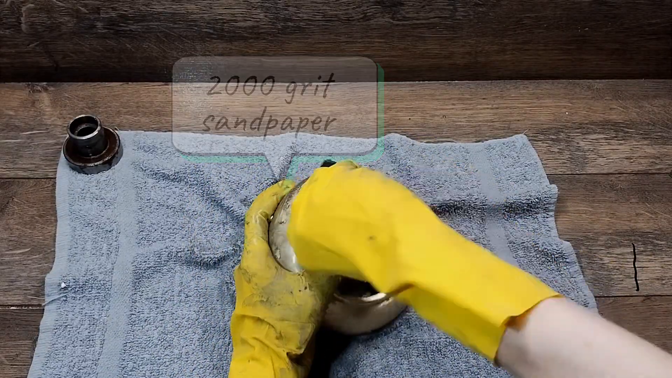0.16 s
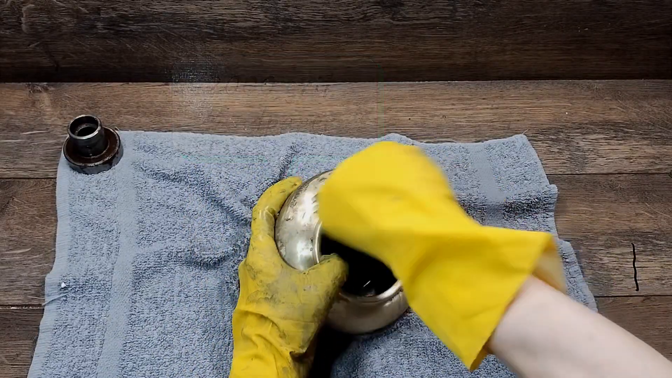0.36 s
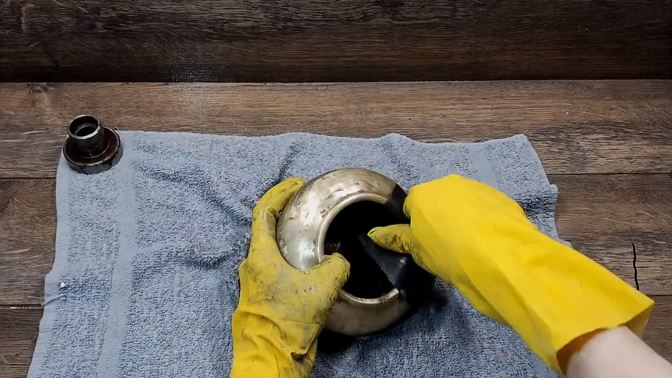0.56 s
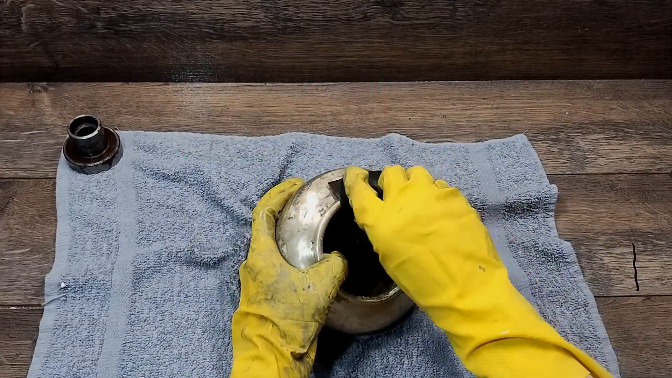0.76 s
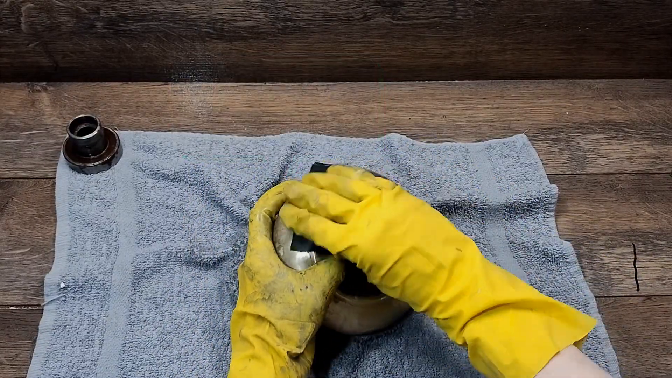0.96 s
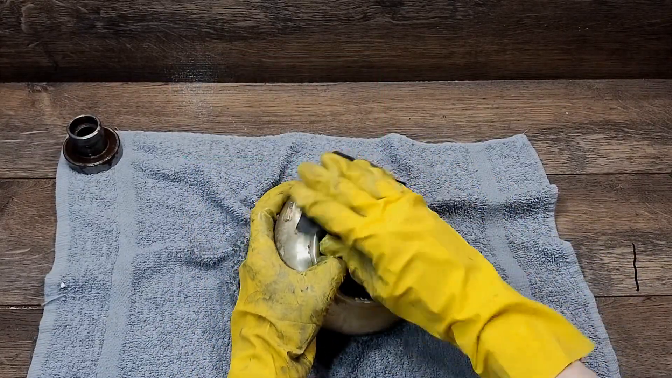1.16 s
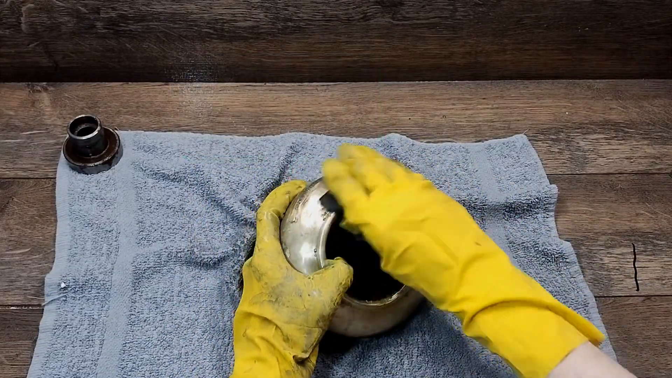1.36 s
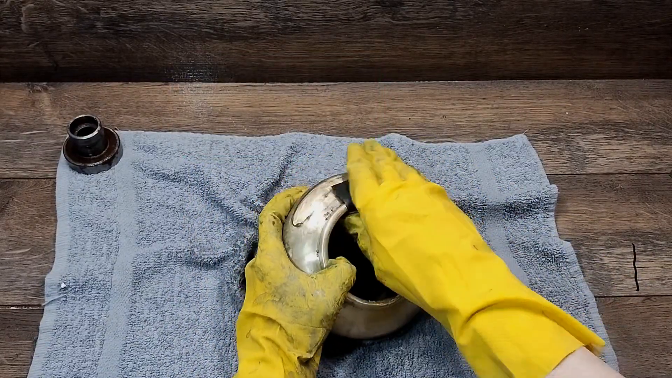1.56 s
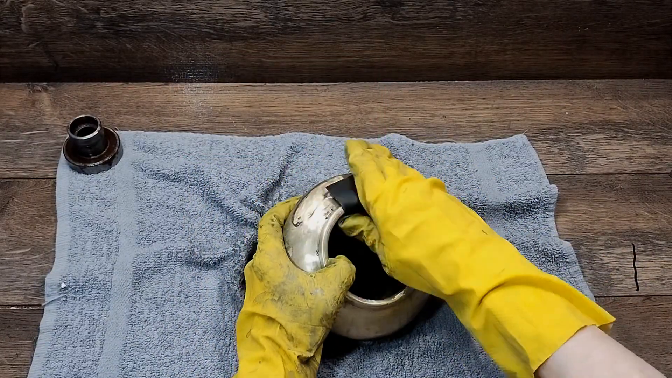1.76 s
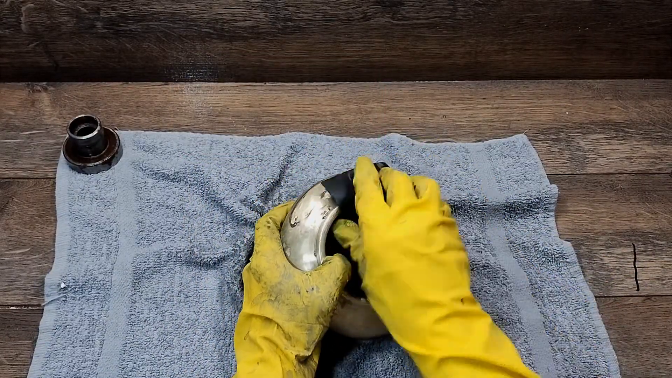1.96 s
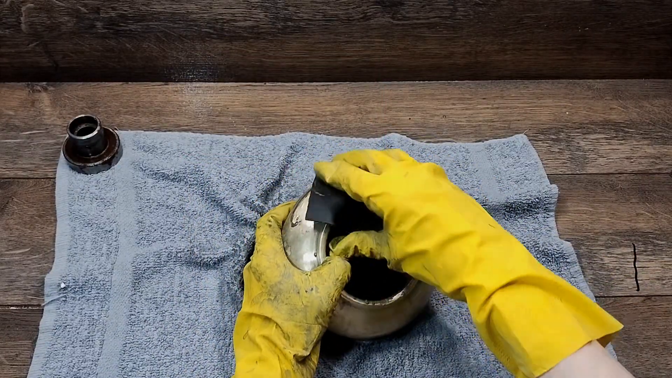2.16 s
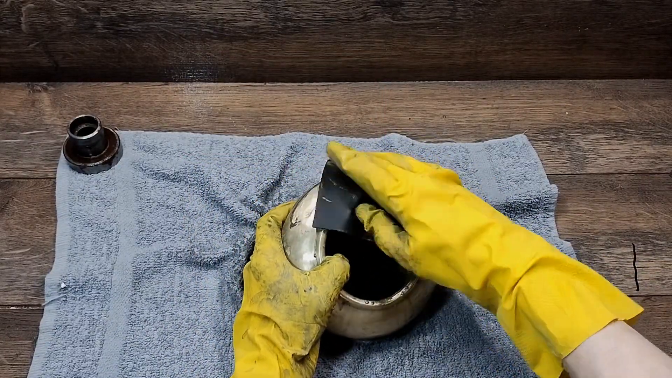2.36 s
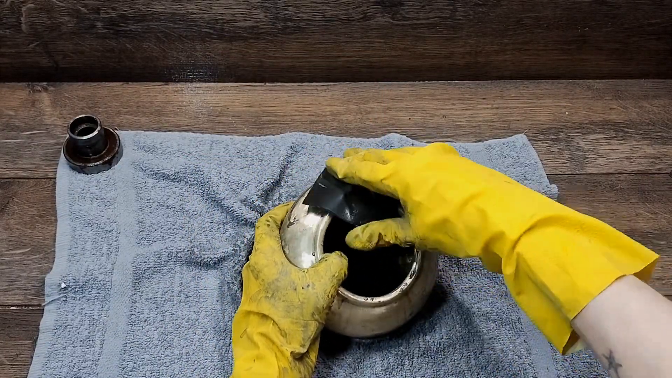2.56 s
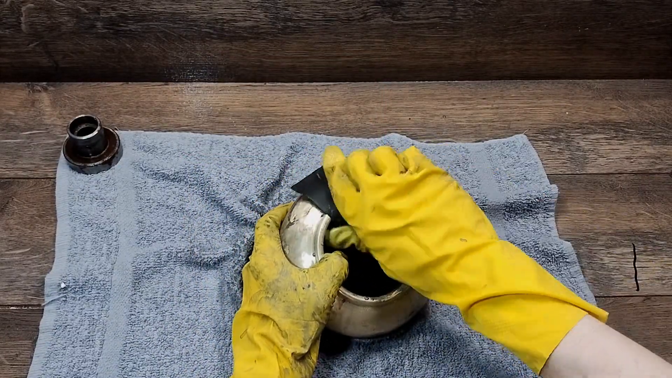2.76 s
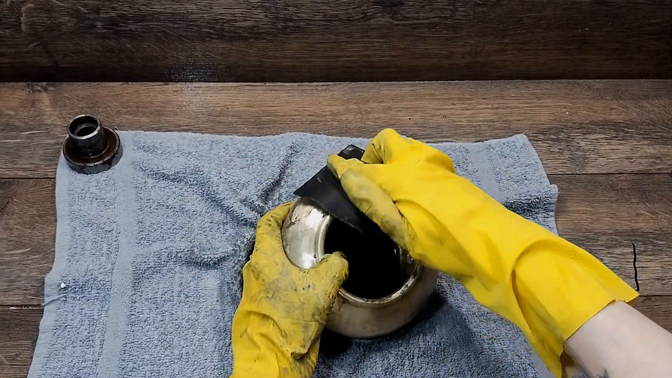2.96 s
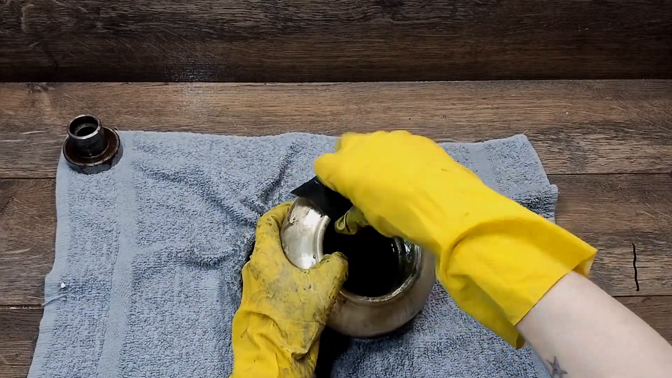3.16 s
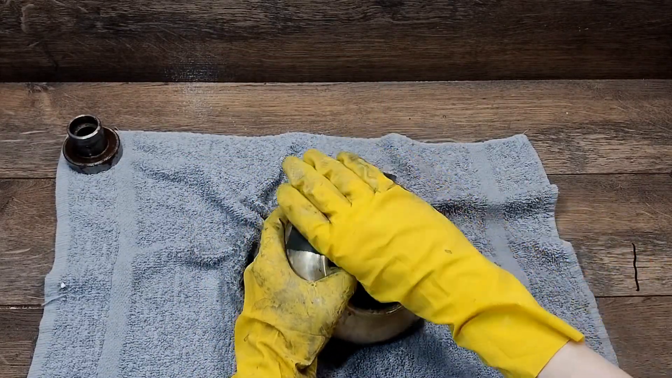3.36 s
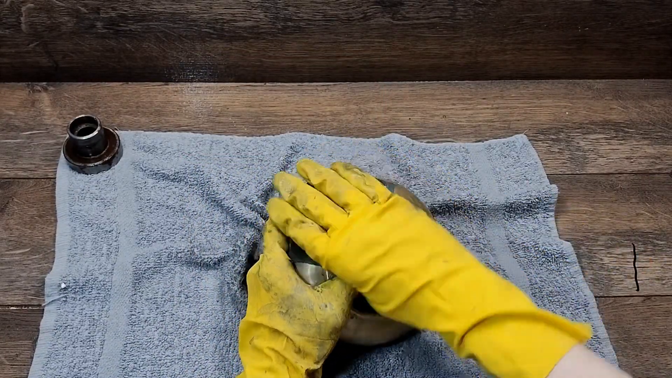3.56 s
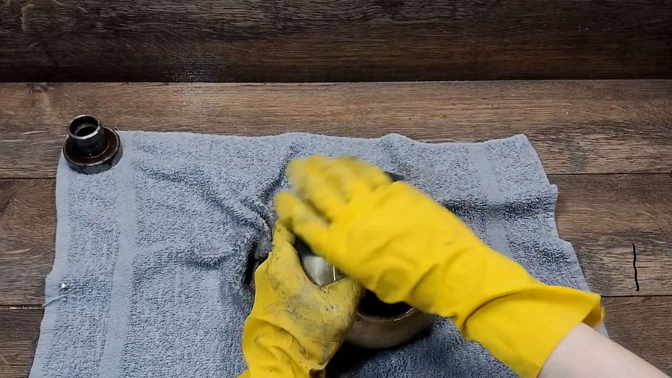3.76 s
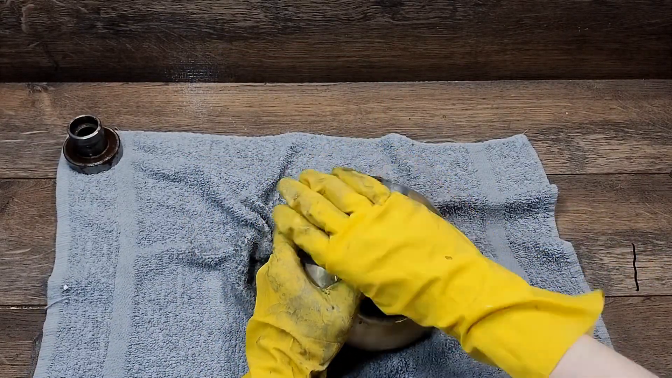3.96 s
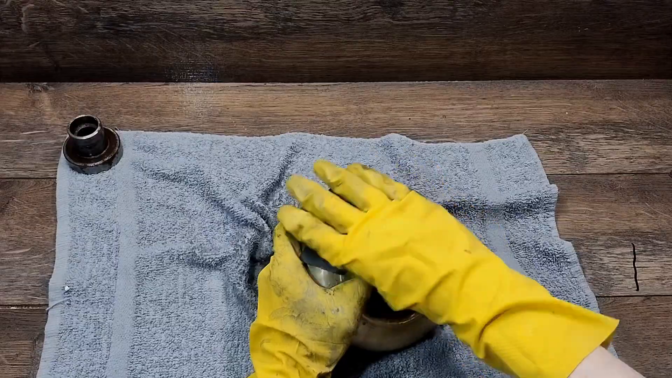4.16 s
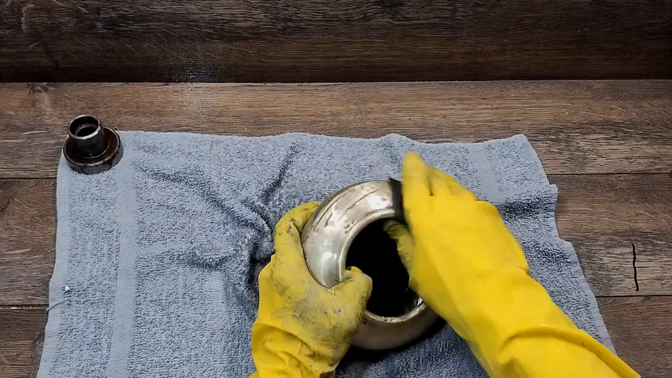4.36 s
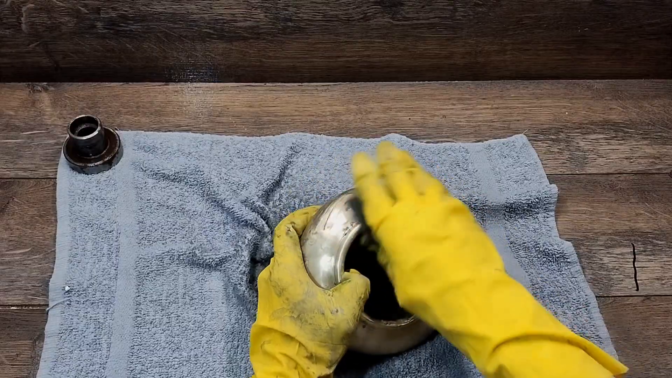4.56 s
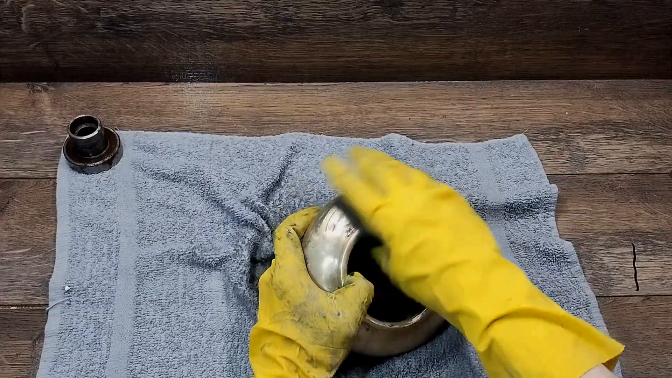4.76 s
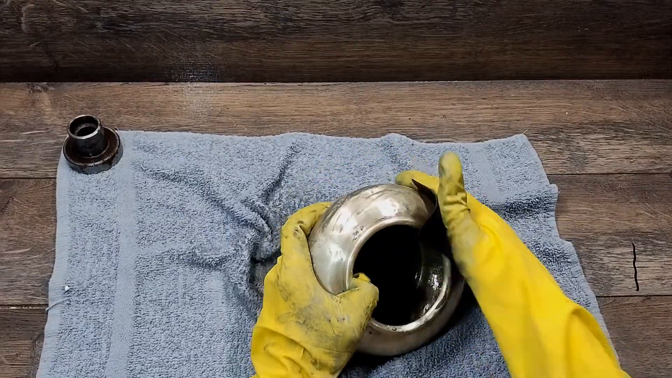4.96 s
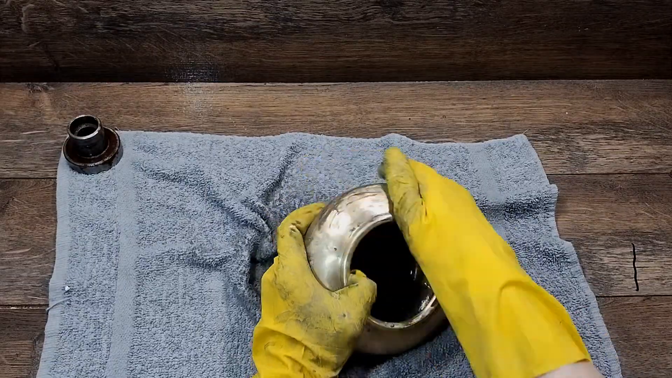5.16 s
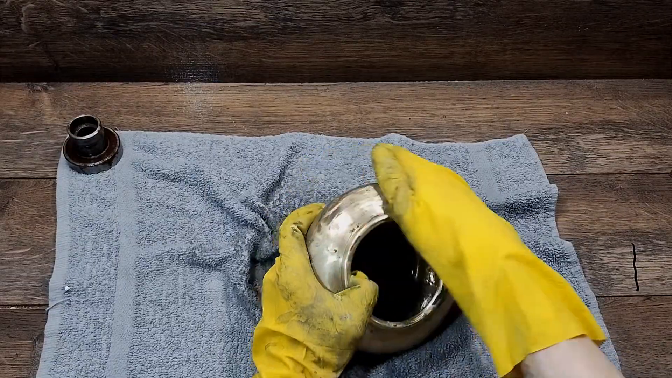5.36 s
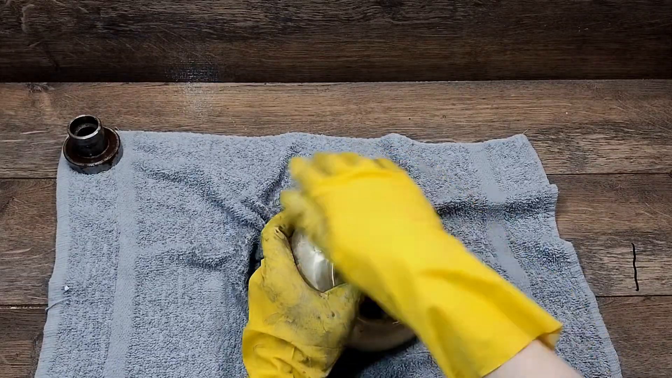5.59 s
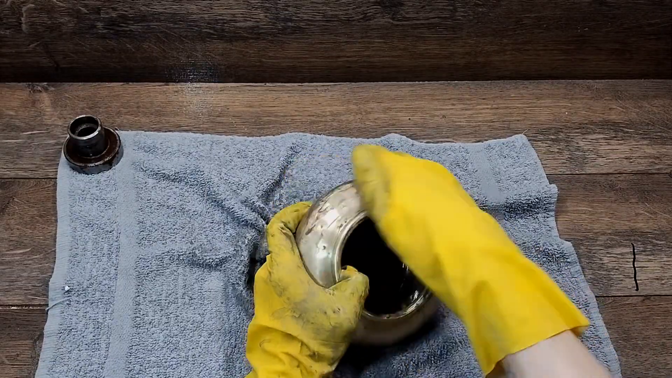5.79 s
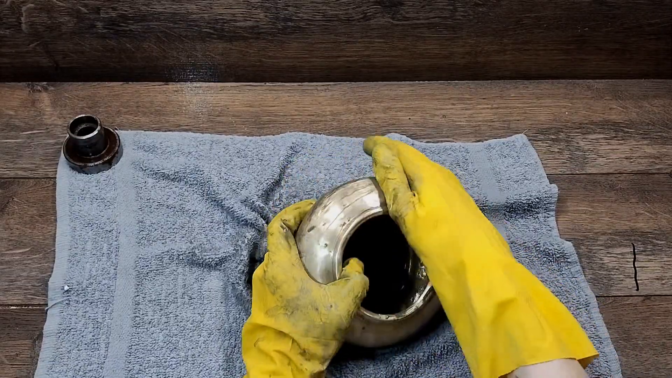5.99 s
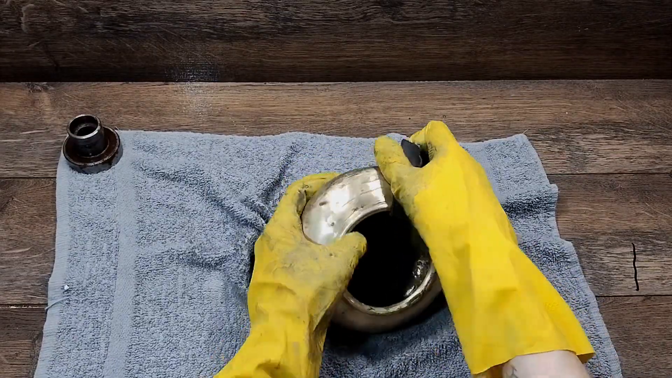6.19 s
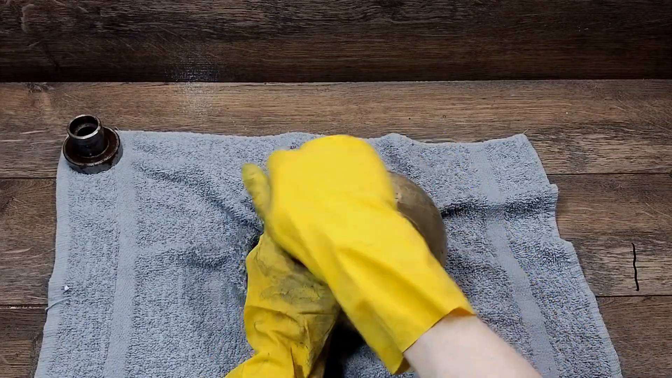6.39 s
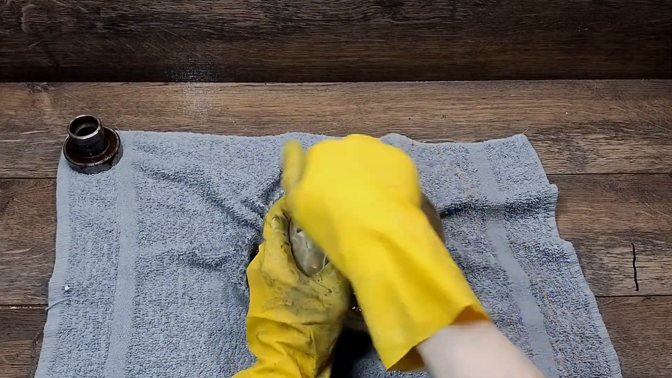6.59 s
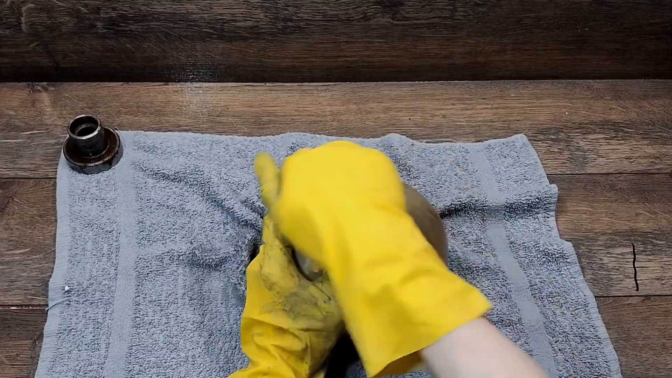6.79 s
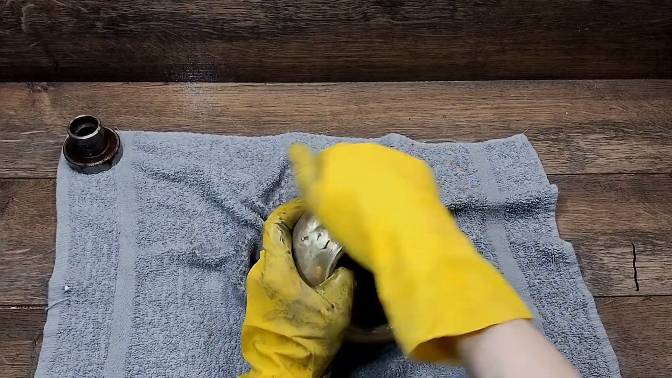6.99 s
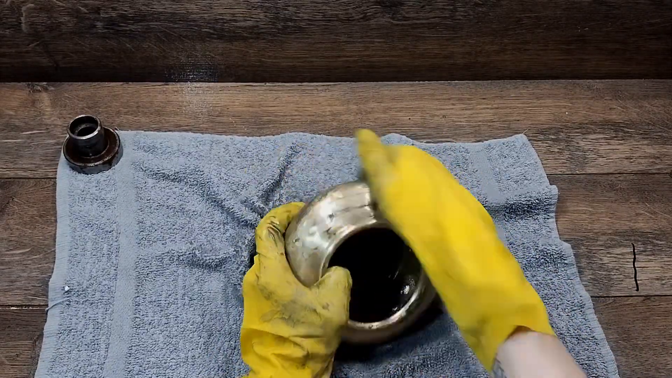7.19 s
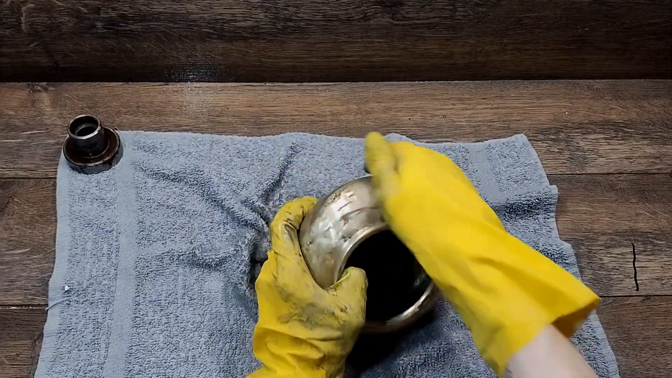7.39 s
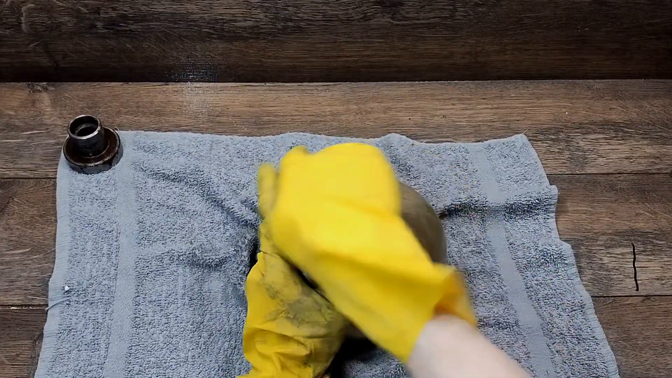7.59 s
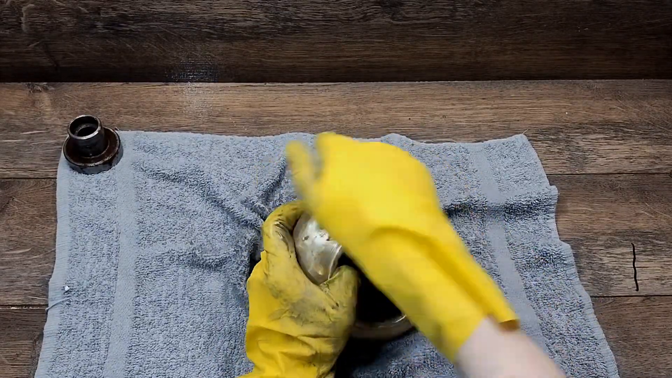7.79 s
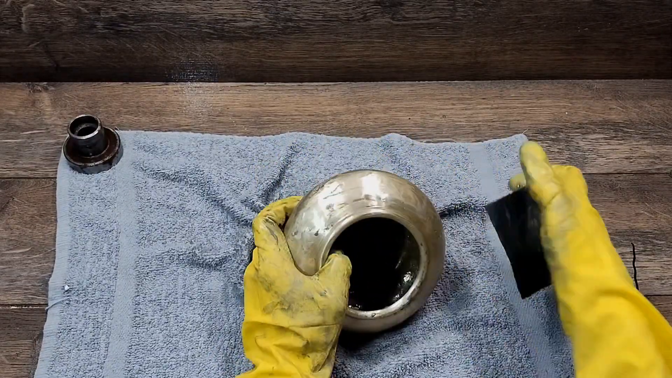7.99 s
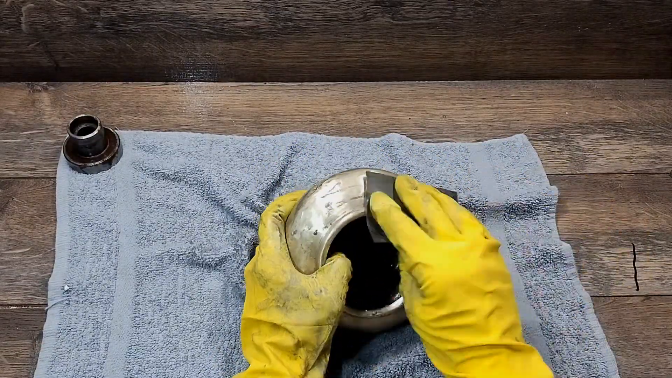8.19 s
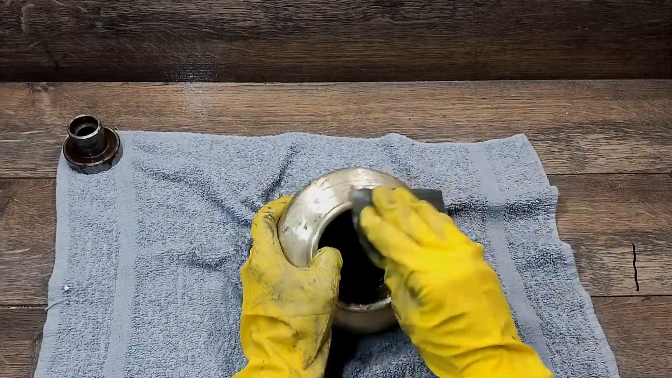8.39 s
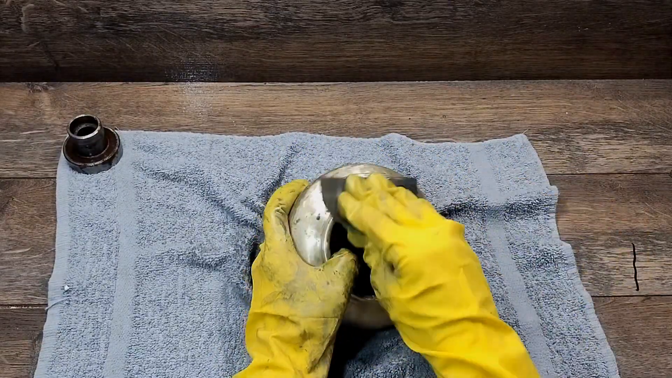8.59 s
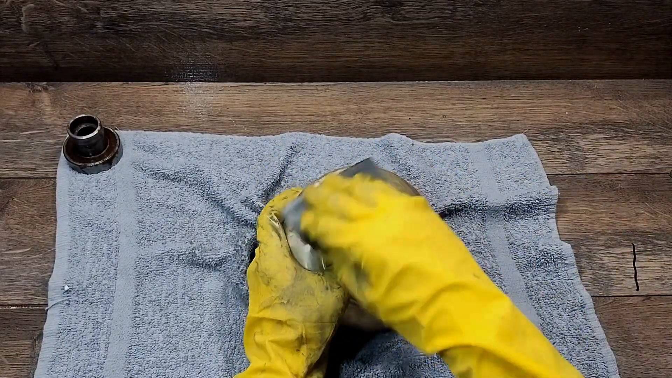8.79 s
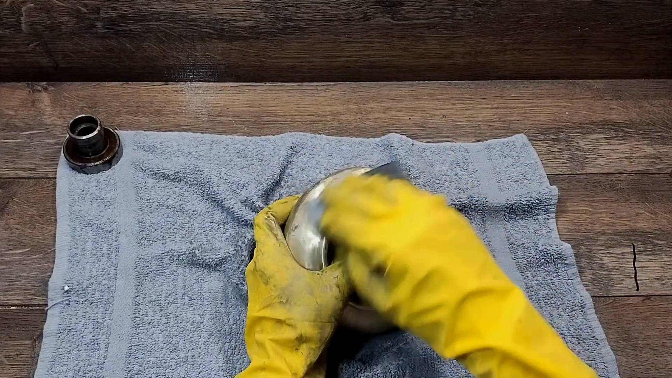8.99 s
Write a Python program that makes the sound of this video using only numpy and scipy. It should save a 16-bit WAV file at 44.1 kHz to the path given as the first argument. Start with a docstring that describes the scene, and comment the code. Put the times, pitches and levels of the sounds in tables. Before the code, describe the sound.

Fine sandpaper scrubs a small brass bowl in quick back-and-forth strokes, a bright hiss over a lower rasp. After about two seconds it drops to faint brushes, rubber squeaks and soft thuds as the grip shifts. Steady sanding resumes with brief lulls and a few short hollow bonks, then turns quicker and lighter, with one louder bonk near the end. The microphone is close, in a quiet room.

```python
"""A quiet room, a stereo pair close to a small brass bowl on a towel, polished in rubber gloves.
Fine sandpaper sets off at once: a bright hiss from the grit, a lower rasp from paper and wall.
The other glove damps the bowl, so its hollow only murmurs. Near 2 s the grip shifts, with faint brushes,
squeaks and thuds. From 3.5 s the strokes run on with brief lulls, and bumping fingers raise short bonks.
After 8 s come quicker, lighter strokes with a higher rasp, and the loudest bonk."""
import sys
import numpy as np
from scipy import signal
from scipy.fft import rfft, irfft
from scipy.io import wavfile
from scipy.ndimage import uniform_filter1d

SR = 44100
rng = np.random.default_rng(int(sys.argv[2]) if len(sys.argv) > 2 else 0)


def int16_out(signal):
    """Quantize to a 16-bit WAV file."""
    q = np.round(np.clip(np.atleast_2d(signal).T, -1, 1) * 32767)
    wavfile.write(sys.argv[1], SR, q.astype(np.int16))


N = 398663
TIME = np.arange(N) / SR
BINS = np.fft.rfftfreq(N, 1 / SR)
FRAME, HOP = 512, 128  # samples
FRAMING = dict(nperseg=FRAME, noverlap=FRAME - HOP)
FULL_DB = -31.5  # stroke level that counts as full effort
# how the paper lies on the bowl: time_s, rasp_pitch_factor, ring_vs_rasp_db, comb_db, rasp_vs_hiss_db
CONTACT = [(0, 1.01, -9, 4.5, -6.5), (.58, 1.08, -3, 6.5, -6), (.9, 0.98, -10, 2, -8.5),
           (1.1, 1.16, -4, 1.5, -7.5), (1.36, 1, -6, 3.5, -8), (1.6, 1.04, -8, 4.5, -8),
           (1.85, 1.08, 0, 6, -5), (2.1, 1.04, 0, 5, -15), (2.9, 0.91, -7, 4, -16),
           (3.42, 1.07, -6, 4, -10.5), (3.8, 1.05, -6, 5.5, -5.5), (4.4, 1.01, -7.5, 3, -7.5),
           (4.85, 1.22, -8.5, 7, -10), (5.15, 0.96, -16, 2, -6), (5.9, 0.96, -17, 3, -7),
           (6.25, 1.1, -16, 3, -10.5), (6.6, 0.93, -19, 2, -7.5), (7.6, 0.98, -12, 5.5, -10),
           (7.95, 1.04, -19, -3, -7), (8.33, 1.29, -6, 2.5, -12.5), (8.65, 1.4, -6, 2.5, -5.5),
           (9.04, 1.3, -6.5, 2, -5.5)]


def sandpaper(effort, rasping):
    """Grit scrapes the brass under each stroke, with a grip that flutters, and sets the wall ringing."""
    # hiss of the grit, pressed down and barely touching: frequency_hz, gain_db
    hiss_colour = [(900, -58), (2000, -39), (3500, -12.5), (5000, -6), (6000, -4), (7200, -2), (8500, 1.45),
                   (10000, 1.5), (11200, -0.5), (12500, -2.5), (14300, -7)]
    skim_colour = [(900, -13), (3000, -12), (5000, -20), (7500, -5.5), (8700, 0), (10500, -0.5),
                   (14300, -6)]
    # damped modes of the held wall: pitch_hz, width_hz, gain_db
    wall_modes = [(1060, 180, -8), (1484, 55, -9), (2170, 260, -1), (2355, 120, 2), (2820, 120, 3),
                  (3290, 190, -6.5), (3970, 250, -8)]
    firm_db = -47.5  # strokes above this press the whole paper down
    times, _, ring_db, _, rasp_db = np.transpose(CONTACT)
    hiss_level = gain_of(FULL_DB) * effort
    rasp_level = gain_of(FULL_DB + np.interp(TIME, times, rasp_db)) * rasping
    grip = gain_of(.5 * wander(rate_hz=70) + .35 * wander(rate_hz=500))
    grains = grit(per_s=12000, spread_db=2, bed=1.3)
    scrape = shaded(grains, depth_db=2.14, width_hz=240, hold_s=0.029)
    firm = hiss_level ** 2 / (hiss_level ** 2 + gain_of(firm_db) ** 2)
    hiss = firm * radiate(scrape, tone(hiss_colour))
    hiss += (1 - firm) * radiate(scrape, tone(skim_colour))  # a light touch gives only a thin fizz
    rub = shaded(grains, depth_db=1.5, width_hz=200, hold_s=0.11)
    rasp = radiate(under_fingers(rub, gap_ms=1.724, travel_ms=0.251), 1)
    modes = sum(gain_of(db) * peak(hz, width) for hz, width, db in wall_modes)
    wall = radiate(shaded(noise(), depth_db=1, width_hz=180, hold_s=0.16), modes)
    ring = gain_of(np.interp(TIME, times, ring_db))
    body = (rasp + ring * wall) / np.sqrt(1 + ring ** 2)
    return grip * (gain_of(0.81) * hiss_level * hiss + gain_of(-0.6) * rasp_level * body)


def under_fingers(x, gap_ms, travel_ms):
    """The rasp's pitch follows the contact, and an echo off the sliding glove sweeps a comb through it."""
    # rasp of the paper: frequency_hz, gain_db
    rasp_colour = [(500, -20), (1000, -23.5), (1750, -15.5), (2100, -7.5), (2400, -3), (2800, 0.5),
                   (3300, 2.5), (4000, -0.5), (5000, -5), (7000, -10), (12000, -42)]
    hz, t, spectra = signal.stft(x, SR, **FRAMING)
    times, pitch, _, comb_db, _ = np.transpose(CONTACT)
    colour_db = read(rasp_colour, hz[:, None] / np.interp(t, times, pitch))
    echo_s = (gap_ms + travel_ms * np.interp(t, TIME, wander(rate_hz=6))) / 1000
    colour_db += np.interp(t, times, comb_db) * np.cos(2 * np.pi * hz[:, None] * echo_s)
    return signal.istft(spectra * gain_of(colour_db), **FRAMING)[1][:, :N]


def stroking():
    """Effort and the rasp it raises; hiss needs more speed, so the sound dulls at each turn of the hand."""
    # each push or pull of the paper: start_s, length_s, level_db, top_speed_at_share
    strokes = [(-0.005, 0.073, -35.0, 0.29), (0.074, 0.046, -31.5, 0.33), (0.107, 0.079, -36.5, 0.28),
               (0.166, 0.1, -34, 0.59), (0.296, 0.12, -36.0, 0.19), (0.402, 0.11, -35.5, 0.45),
               (0.519, 0.054, -35, 0.4), (0.561, 0.079, -36, 0.21), (0.646, 0.074, -38, 0.32),
               (0.693, 0.058, -41.5, 0.59), (0.743, 0.13, -51, 0.4), (0.907, 0.14, -38, 0.63),
               (1.02, 0.086, -47.5, 0.67), (1.098, 0.063, -36.5, 0.21), (1.187, 0.069, -46, 0.2),
               (1.229, 0.066, -39.5, 0.46), (1.302, 0.13, -36.5, 0.42), (1.429, 0.097, -35.5, 0.34),
               (1.533, 0.062, -37.5, 0.38), (1.587, 0.061, -36, 0.22), (1.656, 0.092, -35.5, 0.35),
               (1.743, 0.057, -36.0, 0.29), (1.798, 0.042, -37.5, 0.4), (1.908, 0.023, -56, 0.6),
               (2.028, 0.069, -50.5, 0.23), (2.061, 0.049, -41.5, 0.45), (2.105, 0.045, -51.5, 0.5),
               (2.164, 0.12, -59.5, 0.56), (2.335, 0.055, -53, 0.24), (2.597, 0.04, -53.5, 0.5),
               (2.63, 0.036, -48.5, 0.45), (2.804, 0.037, -54.5, 0), (2.84, 0.027, -53.5, 0.35),
               (3.363, 0.11, -40, 0.74), (3.473, 0.079, -47, 0.38), (3.52, 0.063, -32, 0.38),
               (3.612, 0.058, -31.5, 0.38), (3.661, 0.087, -33, 0.56), (3.734, 0.05, -40.5, 0.5),
               (3.788, 0.084, -34, 0.6), (3.869, 0.132, -35.5, 0.47), (3.998, 0.077, -32.0, 0.48),
               (4.066, 0.084, -30.5, 0.66), (4.136, 0.12, -33.0, 0.58), (4.249, 0.067, -29.5, 0.61),
               (4.311, 0.083, -32, 0.33), (4.388, 0.054, -31.0, 0.63), (4.432, 0.069, -31.5, 0.52),
               (4.495, 0.064, -30.0, 0.51), (4.544, 0.056, -30, 0.42), (4.594, 0.07, -30.5, 0.36),
               (4.642, 0.054, -31.5, 0.33), (4.686, 0.065, -31.5, 0.57), (4.744, 0.082, -33.5, 0.34),
               (4.821, 0.074, -28, 0.53), (4.874, 0.056, -43, 0.6), (5.017, 0.109, -45, 0.4),
               (5.057, 0.13, -33.5, 0.59), (5.187, 0.084, -32.0, 0.48), (5.274, 0.099, -33.5, 0.58),
               (5.38, 0.078, -32, 0.36), (5.455, 0.075, -30.5, 0.5), (5.522, 0.085, -31, 0.48),
               (5.593, 0.084, -30.5, 0.42), (5.677, 0.067, -30.5, 0.36), (5.734, 0.077, -31, 0.53),
               (5.805, 0.086, -31, 0.35), (5.864, 0.074, -31, 0.5), (5.932, 0.098, -32.0, 0.34),
               (5.991, 0.068, -46, 0.75), (6.065, 0.097, -47.5, 0.47), (6.2, 0.097, -56.5, 0.55),
               (6.314, 0.041, -46, 0.53), (6.351, 0.12, -50.5, 0.13), (6.421, 0.094, -33.5, 0.45),
               (6.512, 0.091, -31, 0.49), (6.59, 0.124, -33, 0.64), (6.72, 0.071, -30.5, 0.43),
               (6.781, 0.1, -31.5, 0.46), (6.89, 0.076, -31.5, 0.4), (6.972, 0.092, -31.5, 0.53),
               (7.062, 0.084, -32.5, 0.4), (7.145, 0.076, -31.5, 0.43), (7.219, 0.083, -32, 0.65),
               (7.274, 0.13, -33.5, 0.58), (7.395, 0.069, -31.5, 0.41), (7.45, 0.1, -32.5, 0.45),
               (7.565, 0.071, -32.0, 0.36), (7.634, 0.082, -32.0, 0.41), (7.718, 0.077, -33, 0.38),
               (7.78, 0.08, -32.5, 0.48), (7.868, 0.073, -33.5, 0.38), (7.922, 0.089, -43, 0.51),
               (8.254, 0.066, -51.5, 0.34), (8.307, 0.077, -35.5, 0.39), (8.392, 0.07, -34.5, 0.44),
               (8.454, 0.047, -35.5, 0.47), (8.492, 0.052, -41, 0.64), (8.54, 0.048, -37.5, 0.32),
               (8.585, 0.036, -41, 0.46), (8.616, 0.038, -36.5, 0.43), (8.652, 0.051, -42.5, 0.39),
               (8.696, 0.044, -39, 0.45), (8.739, 0.061, -38.5, 0.32), (8.808, 0.049, -37, 0.38),
               (8.841, 0.079, -37, 0.48), (8.929, 0.053, -35.5, 0.48), (8.974, 0.048, -35, 0.48),
               (9.018, 0.041, -36.5, 0.45)]
    usual_s, rasp_exponent = 0.094, 0.73
    effort_power, rasp_power = np.zeros((2, N))
    for start, length, db, top in list(strokes) + brushes():
        span, shape = swing(start, length, top)
        push = gain_of(db - FULL_DB) * shape
        long_stroke_db = 1.5 * np.log2(length / usual_s)  # long, slow strokes rasp more
        effort_power[span] += push ** 2
        rasp_power[span] += (push ** rasp_exponent * gain_of(long_stroke_db)) ** 2
    return np.sqrt(effort_power), np.sqrt(rasp_power)


def swing(start, length, top):
    """The hand speeds up, peaks at the share top of the stroke and stops: (samples, hiss amplitude)."""
    span = slice(*np.searchsorted(TIME, [start, start + length]))
    progress = np.clip((TIME[span] - start) / length, 0, 1)
    skew = np.log(.5) / np.log(np.clip(top, .1, .9))
    speed = abs(np.sin(np.pi * progress ** skew))
    return span, speed ** 1.64


def brushes():
    """The paper brushes the brass in faint chance strokes while the fingers shift their grip."""
    # shifts of grip: start_s, end_s, level_db
    regrips = [(1.834, 2.02, -59), (2.16, 2.62, -60.5), (2.739, 2.99, -62.5), (3.094, 3.39, -74.5),
               (4.91, 4.98, -57)]
    usual_s = 0.0466
    rows = []
    for start, end, db in regrips:
        for stretch, top in rng.uniform([.5, .2], [1.5, .8], (20, 2)):
            length = stretch * usual_s
            if start + length / 2 < end:
                rows.append((start, length, db, top))
            start += length
    return rows


def grit(per_s, spread_db, bed):
    """Grains catch and let go: tiny clicks of uneven size over a bed of countless finer ones."""
    sizes = gain_of(spread_db * np.minimum(rng.exponential(1, N), 4))
    catches = rng.random(N) < per_s / SR
    return evened(sizes * catches * noise()) + bed * noise()


def shaded(x, depth_db, width_hz, hold_s):
    """The moving hand covers and mirrors the contact, so peaks and dips drift through the sound."""
    spectra = signal.stft(x, **FRAMING)[2]
    ripple = rng.standard_normal(spectra.shape)
    for axis, span in ((1, width_hz * FRAME / SR), (2, hold_s * SR / HOP)):
        for _ in range(2):
            ripple = uniform_filter1d(ripple, max(round(span), 1), axis)
    spectra *= gain_of(depth_db * evened(ripple))
    return evened(signal.istft(spectra, **FRAMING)[1][:, :N])


def hands(effort):
    """Glove and paper drag over the bowl; their pressure stirs the air in it and rocks it on the towel."""
    # the hands at full effort: time_s, drag_db, hollow_db, rocking_db
    handling = [(0, -53, -58.5, -58.5), (.55, -56, -57, -59), (.88, -56, -60.5, -63.5),
                (1.08, -57.5, -58, -62.5), (1.65, -54, -61.5, -59), (2.15, -62, -62.5, -64),
                (2.45, -60, -61.5, -60), (3.08, -70.5, -82, -71), (3.35, -67, -74, -65.5),
                (3.75, -53, -59.5, -59), (4.25, -51, -56.5, -62.5), (4.7, -49, -55, -57),
                (5.2, -55, -70.5, -61), (6.3, -54, -65, -62), (7.5, -61.5, -65, -62.5),
                (8.18, -63, -69.5, -63), (8.66, -52.5, -52.5, -63), (9.04, -51, -60.5, -73)]
    # light dragging, the hollow under the hand, dull rocking on the table: frequency_hz, gain_db
    drag_colour = [(300, -2.5), (750, -8.5), (1050, 1.5), (1450, 4), (1800, 0.5), (2350, 6.5), (3100, 0.5),
                   (4000, -13), (5500, -21.5), (9000, -9), (14000, -17.5)]
    hollow_colour = [(30, -27), (70, -5), (150, -13), (310, -7.5), (410, 4), (510, 1.5), (620, -5.5),
                     (800, -14.5), (1500, -26), (4000, -58)]
    rocking_colour = [(20, -12), (50, -13.5), (100, -5), (150, 1), (240, 2), (320, -3), (500, -14.5),
                      (1000, -47)]
    times, *levels = np.transpose(handling)
    drag_db, hollow_db, rocking_db = (np.interp(TIME, times, level) for level in levels)
    motion = np.hypot(effort, 0.17)  # the hands never quite rest
    snags = grit(per_s=2500, spread_db=2.8, bed=1.1)
    crinkle = shaded(snags, depth_db=3.0, width_hz=250, hold_s=0.047)
    drag = radiate(crinkle, tone(drag_colour)) * motion ** 0.21
    drag *= gain_of(drag_db + 2.05 * wander(rate_hz=56))
    murmur = shaded(noise(), depth_db=4.0, width_hz=90, hold_s=0.07)
    hollow = radiate(murmur, tone(hollow_colour)) * motion ** 0.17  # duller layers follow effort less
    hollow *= gain_of(hollow_db + 2.4 * wander(rate_hz=24))
    rocking = radiate(noise(), tone(rocking_colour))
    rocking *= np.hypot(gain_of(rocking_db + 1.8 * wander(rate_hz=9.8)), thuds(swell_s=0.013))
    return drag + hollow + rocking


def bumps(t60_s, swell_s, tap_s):
    """A finger taps the wall and the air in the bowl bonks, lower when the hand covers the mouth."""
    # fingers knocking the bowl: start_s, pitch_hz, bonk_db, tap_db
    knocks = [(4.419, 480, -41, -46), (4.481, 405, -39, -60), (4.612, 466, -40, -51),
              (4.787, 430, -39, -46), (4.797, 350, -37, -67), (4.856, 447, -43, -50),
              (8.055, 402, -62, -51.5), (8.597, 445, -38, -60), (8.666, 462, -40, -41.5),
              (8.673, 426, -23.5, -46), (8.75, 420, -41, -61), (8.794, 456, -40, -62)]
    # a dry tap: frequency_hz, gain_db
    tap_colour = [(250, -16), (550, 0), (950, 6), (1500, 7), (2400, 5), (4000, -12), (12000, -48)]
    out, t = np.zeros((2, N)), TIME[:SR // 5]
    fade = ease(t / swell_s) * gain_of(-60 * t / t60_s)
    to_right = gain_of([[-2], [3]])
    tap_noise = radiate(noise(), tone(tap_colour))
    for start, hz, bonk_db, tap_db in knocks:
        add(out, start, gain_of(bonk_db) * fade * np.sin(2 * np.pi * hz * t) * to_right)
        tap = np.exp(-t / tap_s) * tap_noise[:, round(start * SR):][:, :len(t)]
        add(out, start, gain_of(tap_db) * tap)
    return out


def squeaks():
    """Rubber sticks and slips for a moment: a fuzzy whistle that swells and fades."""
    # rubber and paper slipping on brass: centre_s, length_s, pitch_hz, width_hz, level_db
    slips = [(1.245, .06, 2300, 150, -47), (1.36, 0.14, 2260, 170, -47), (2.298, 0.14, 2800, 120, -60),
             (2.634, 0.058, 3250, 260, -53.5), (3.112, 0.037, 3400, 900, -70),
             (6.24, 0.055, 3630, 450, -66), (7.953, .08, 2470, 260, -50.5)]
    out, friction = np.zeros((2, N)), noise()
    for centre, length, hz, width, db in slips:
        swell = ease(1 - 2 * abs(TIME - centre) / length) ** .5
        out += gain_of(db) * swell * radiate(friction, peak(hz, width))
    return out


def thuds(swell_s):
    """Amplitude of the dull thuds as the bowl settles on the towel."""
    # the bowl settling: start_s, level_db
    settlings = [(.06, -60), (1.92, -53), (2.34, -58), (8.21, -56)]
    level = np.zeros(N)
    for start, db in settlings:
        age = np.maximum(TIME - start, 0) / swell_s
        level += gain_of(db) * age * np.exp(1 - age)
    return level


def reflections(x, t60_s):
    """Table and walls return a short diffuse tail."""
    t = TIME[:SR // 3]
    tail = rng.standard_normal((2, len(t))) * gain_of(-60 * t / t60_s) * (t > .003)
    return signal.fftconvolve(x, tail / np.linalg.norm(tail[0]), axes=1)[:, :N]


def room():
    """The room's low, steady rush."""
    # room tone: frequency_hz, gain_db
    room_colour = [(20, -24), (45, -13), (80, -16.5), (130, -5.5), (190, -3.5), (250, 0.5), (320, -5.5),
                   (450, -10), (600, -13), (950, -11), (1300, -22), (3000, -25.5), (5500, -31.5),
                   (14000, -42)]
    return radiate(noise(), tone(room_colour))


def radiate(drive, colour):
    """Colours a two-channel drive and spreads it over the microphones; rms one."""
    # likeness of the two microphones: frequency_hz, correlation
    likeness = [(100, 0.96), (250, 0.96), (500, 0.66), (1000, 0.081), (2300, 0.3), (4000, 0.14), (14000, 0)]
    # the work lies a little to the right: frequency_hz, left_minus_right_db
    balance = [(130, 0), (260, -1), (500, 1), (1100, -1.5), (2300, 1), (3300, 1), (4500, -2.5), (6000, -7),
               (8500, -11.5), (10500, -10), (13000, -8)]
    left, unrelated = rfft(drive)
    same = read(likeness, BINS)
    pair = np.array([left, same * left + np.sqrt(1 - same ** 2) * unrelated])
    sides = gain_of(np.array([[.5], [-.5]]) * read(balance, BINS))
    sides /= np.sqrt(np.mean(sides ** 2, 0))
    return evened(irfft(pair * colour * sides, N))


def gain_of(db):
    """Decibels to amplitude."""
    return 10 ** (np.asarray(db) / 20)


def evened(x):
    """Scales to an rms of one."""
    return x / np.sqrt(np.mean(x ** 2) + 1e-20)


def read(points, hz):
    """Reads a table along a logarithmic frequency axis."""
    frequencies, values = np.transpose(points)
    return np.interp(np.log(hz + 1), np.log(frequencies + 1), values)


def tone(points):
    """The gain of a colour table at every frequency."""
    return gain_of(read(points, BINS))


def peak(hz, width_hz):
    """The gain of one resonance at every frequency; width_hz is roughly its half-power width."""
    return 1 / (1 + ((BINS - hz) / width_hz * 1.3) ** 2)


def add(mix, start_s, sound):
    """Mixes a stereo sound in at start_s."""
    part = mix[:, max(round(start_s * SR), 0):][:, :sound.shape[-1]]
    part += sound[..., :part.shape[1]]


def wander(rate_hz):
    """Smooth random drift of unit size, changing up to about rate_hz times a second."""
    return evened(irfft(rfft(rng.standard_normal(N)) / (1 + (BINS / rate_hz) ** 4), N))


def noise():
    """Two unrelated channels of white noise."""
    return rng.standard_normal((2, N))


def ease(u):
    """A smooth step from zero to one."""
    return np.sin(np.pi / 2 * np.clip(u, 0, 1)) ** 2


def scene():
    """The work on the bowl, close to the microphones, over the rush of the room."""
    effort, rasping = stroking()
    work = sandpaper(effort, rasping) + hands(effort) + squeaks()
    work += bumps(t60_s=0.067, swell_s=0.0036, tap_s=0.012)
    return work + gain_of(-18) * reflections(work, t60_s=0.22) + gain_of(-61.5) * room()


def record(dry):
    """The recorder's band limit cuts the highest treble."""
    edge_hz = 14350
    lowpass = signal.firwin(401, edge_hz, window=("kaiser", 8), fs=SR)
    return signal.oaconvolve(dry, lowpass[None], "same")


dry = scene()
out = record(dry)
int16_out(out)
```